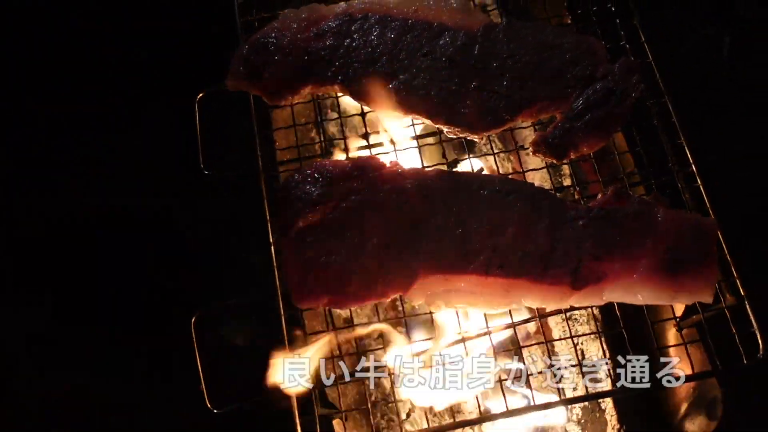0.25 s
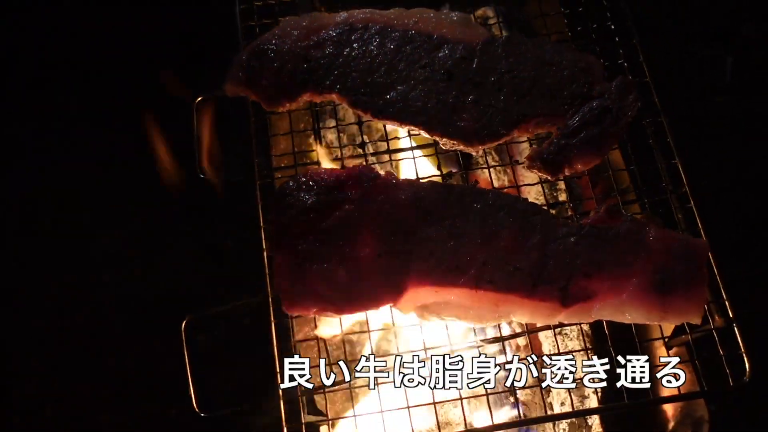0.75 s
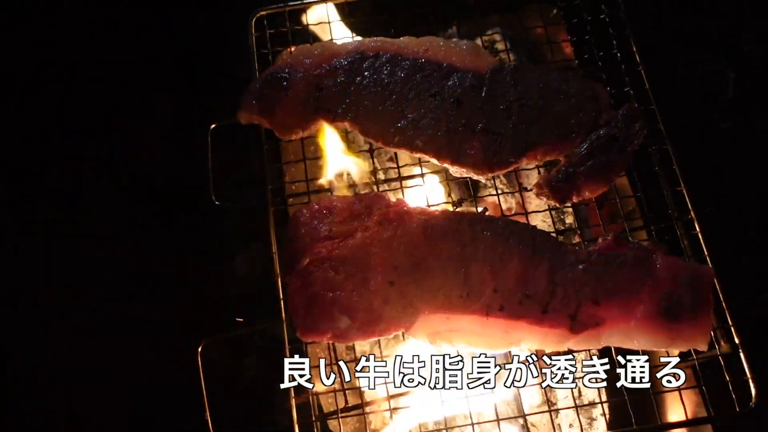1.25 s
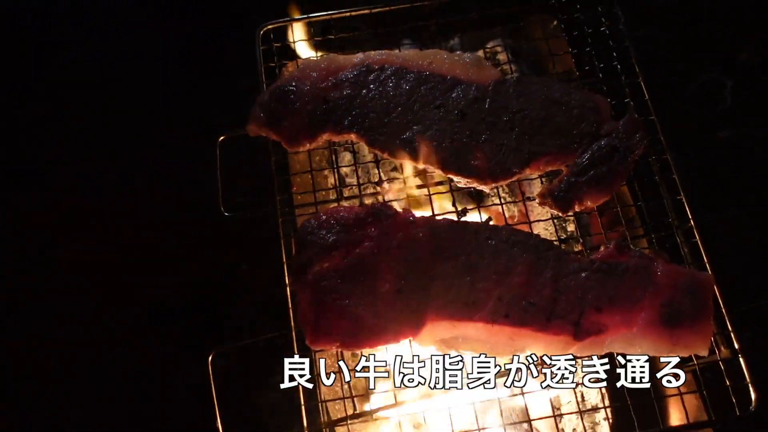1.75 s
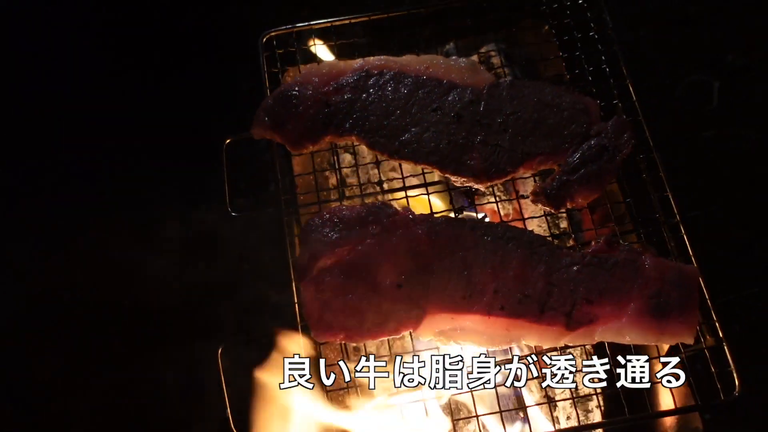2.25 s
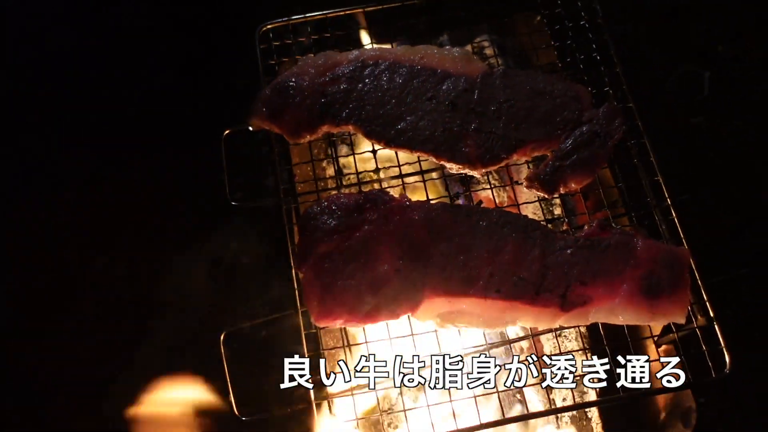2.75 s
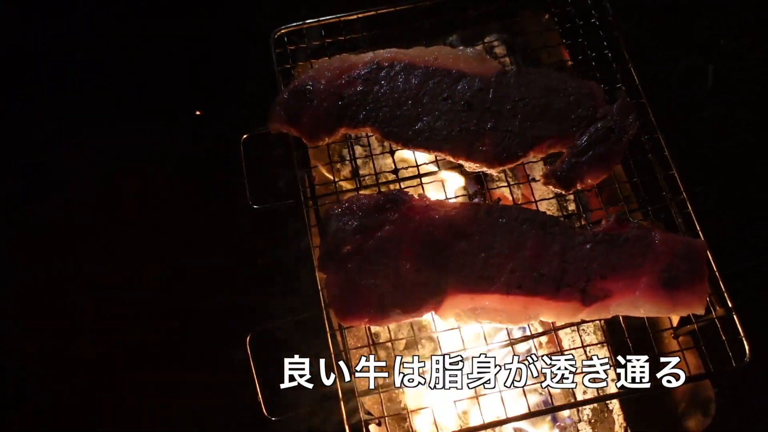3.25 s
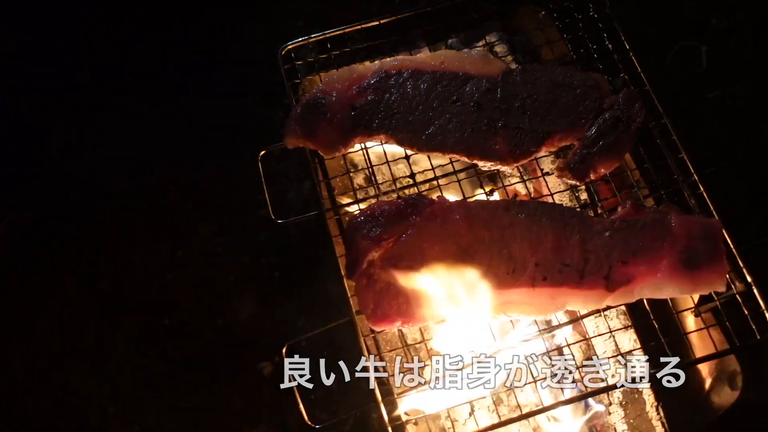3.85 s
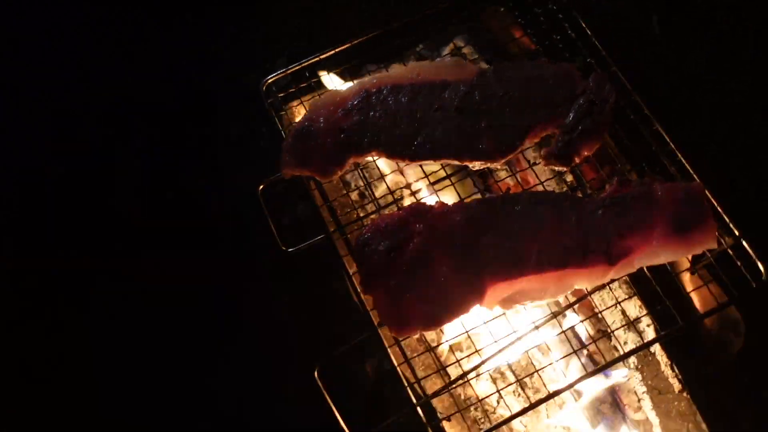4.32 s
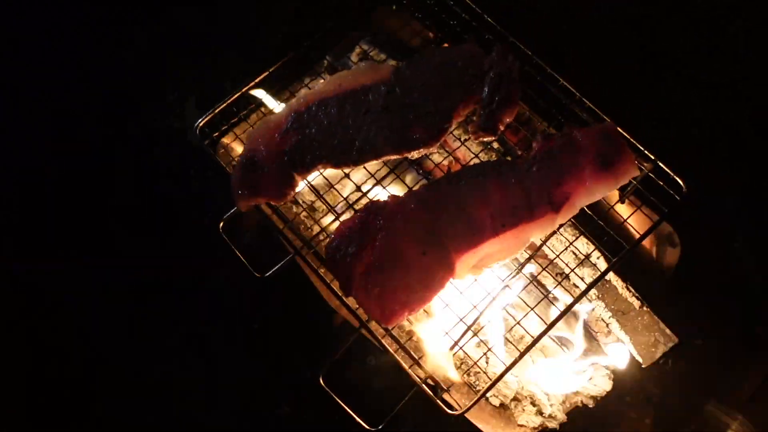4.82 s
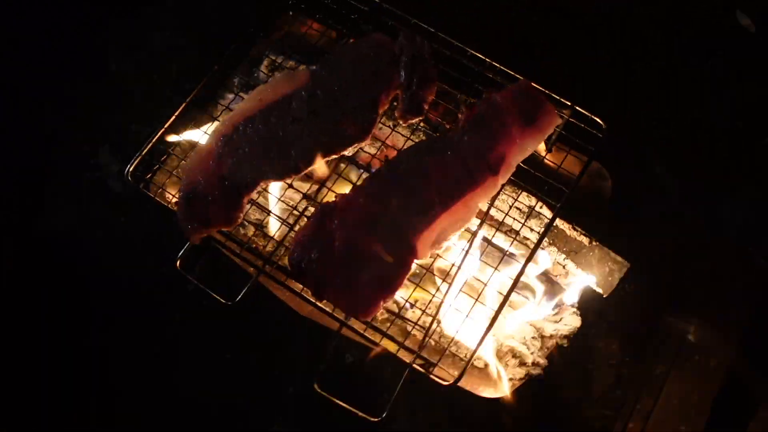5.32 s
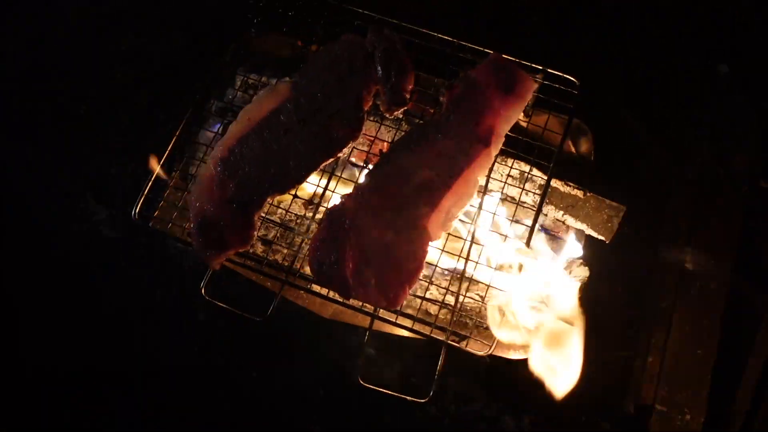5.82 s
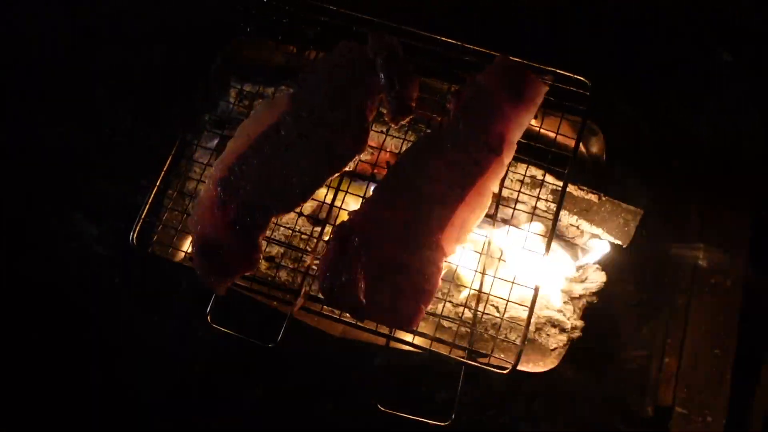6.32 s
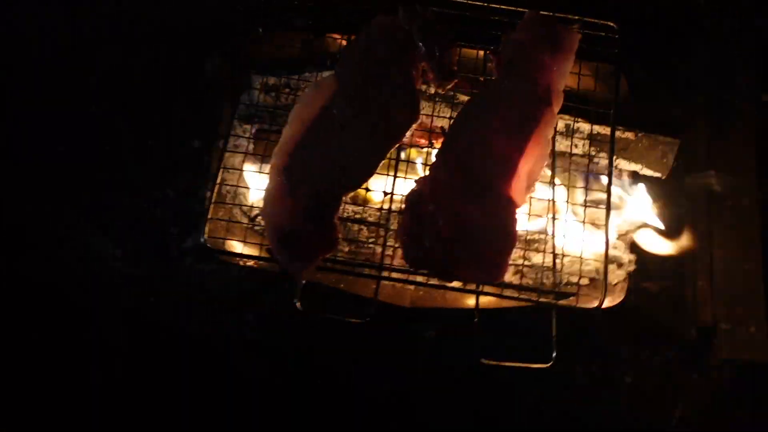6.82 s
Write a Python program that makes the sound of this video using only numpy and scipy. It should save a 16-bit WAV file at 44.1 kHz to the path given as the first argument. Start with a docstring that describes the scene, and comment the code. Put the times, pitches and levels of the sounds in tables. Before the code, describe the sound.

A close microphone picks up meat grilling over hot coals in the open air. After a quick, duller rush of noise, juices hiss steadily with a dense, fine crackle. Sharp little pops of fat come throughout, a few louder than the rest, along with quick surges of harder frying. The sound is bright and nearly dry, with little bass and almost nothing in the background.

```python
"""Steaks sizzle close by on a wire grill over charcoal, outdoors, opening on a fuller rush that dies away.
Juice boils off in a hiss full of tiny steam bursts and swells in spurts of fast frying. Fat pockets
pop and sputter. The bursts scatter briefly among the coals, and the fire tray under the mesh sends
the sizzle back once, a moment late. A faint rumble lies far behind."""
import sys
import numpy as np
from scipy import signal
from scipy.fft import rfft, irfft, next_fast_len
from scipy.io import wavfile
from scipy.ndimage import uniform_filter1d, map_coordinates

SR = 44100
rng = np.random.default_rng(int(sys.argv[2]) if len(sys.argv) > 2 else 0)


def wav_record(signal):
    """Record a signal, one row per channel, as 16-bit PCM in the file named by sys.argv[1]."""
    frames = np.transpose(np.atleast_2d(signal))
    bounded = np.clip(frames, -1, 1)
    # unit amplitude maps onto the largest positive 16-bit level
    quanta = np.round(bounded * 32767).astype(np.int16)
    wavfile.write(sys.argv[1], SR, quanta)


N = 312170


def amp(db):
    return 10 ** (np.asarray(db) / 20)


def unit(x):
    return x / np.sqrt(np.mean(x ** 2) + 1e-20)


def along(points, hz):
    """Read (frequency, value) points on a log axis."""
    f, v = np.transpose(points)
    return np.interp(np.log(hz + 1), np.log(f + 1), v)


def curves(rows):
    """One envelope for each column after the time."""
    s, *cols = np.transpose(rows)
    return [np.interp(np.arange(N) / SR, s, c) for c in cols]


def wobble(rate):
    """A smooth random curve, rate knots a second."""
    return map_coordinates(rng.standard_normal(int(N * rate / SR) + 4), [np.arange(N) * rate / SR])


def filtered(x, response):
    """Shape x with a complex frequency response."""
    m = next_fast_len(N + SR // 2)
    return irfft(rfft(x, m) * response(np.fft.rfftfreq(m, 1 / SR)), m)[..., :N]


def resonance(hz, centre_hz, width_hz):
    """A causal band-pass response."""
    return 1j * hz * width_hz / (centre_hz ** 2 - hz * hz + 1j * hz * width_hz)


def panned(pan_db):
    """Left and right gains for a level difference."""
    return amp(np.array([pan_db / 2, -pan_db / 2]))


def bubble_hiss(colour, patchy_db, flutter_db):
    """Countless small bubbles: noise in patches, with a fast flutter shared by all bands."""
    # stereo width of the hiss: (frequency [Hz], side minus mid [dB])
    width = [(60, -18), (110, -16), (200, -8), (380, -4), (700, -10.5), (1290, -2), (2380, -13),
             (4400, -40), (8120, -87.5), (15000, -44)]
    spectra = signal.stft(rng.standard_normal((2, N)), nperseg=256)[2]
    patches = uniform_filter1d(uniform_filter1d(rng.standard_normal(spectra.shape[1:]), 8, 0), 6, 1)
    pair = signal.istft(spectra * amp(patchy_db * unit(patches)), nperseg=256)[1][:, :N]
    pair *= amp(flutter_db * wobble(140))
    mid, side = filtered(pair, lambda hz: amp(along(colour, hz)) * [hz >= 0, amp(along(width, hz))])
    return unit(np.array([mid + side, mid - side]))


def sizzle(boil, spurt):
    """Juice boils off in an even hiss, with a rougher one riding the spurts."""
    # colour of boiling juice: (frequency [Hz], spectral level [dB])
    boil_colour = [(30, -45), (100, -42), (330, -14.5), (480, -8.5), (650, -4), (1000, -10), (1500, -1.5),
                   (2500, -1.5), (4300, 1.5), (8000, 1), (12500, -5), (15500, -14.5), (17000, 2.5)]
    # colour of fast frying: (frequency [Hz], spectral level [dB])
    fry_colour = [(100, -41), (330, -28), (600, -2.5), (1200, -3.5), (2500, -2), (4300, 0.5), (8000, -2.5),
                  (12500, -7.5), (17000, -28)]
    even = boil * bubble_hiss(boil_colour, patchy_db=1.5, flutter_db=1.23)
    return even + 0.63 * spurt * bubble_hiss(fry_colour, patchy_db=3.0, flutter_db=4.5)


def spurt_envelope():
    """Fast frying comes in bell-shaped swells, summed in power."""
    # swells of frying: (centre time [s], level [dB], length [s])
    spurts = [(0.022, -41, 0.31), (0.602, -42, 0.032), (0.857, -35.5, 0.031), (0.947, -39, 0.11),
              (1.268, -38.5, 0.071), (1.426, -44, 0.074), (1.537, -40.5, 0.049), (1.617, -37, 0.073),
              (1.758, -38, 0.027), (2.035, -42.5, .03), (2.357, -38.5, 0.025), (2.5, -43, .03),
              (2.662, -44.5, .035), (2.812, -38.5, .07), (2.929, -41, .035), (3.609, -40.5, 0.044),
              (3.688, -43.5, 0.059), (3.803, -41, 0.046), (3.936, -39, .012), (4.015, -38.5, .04),
              (4.483, -39, 0.045), (4.878, -37.5, 0.08), (5.3, -44, 0.083), (5.61, -43, .015),
              (5.697, -43, .03), (5.906, -42, .02), (6.193, -43, 0.04), (6.388, -42.5, 0.09),
              (6.549, -43, 0.096), (6.898, -43, 0.04)]
    centre, db, length = np.transpose(spurts)[:, :, None]
    t = np.arange(0, N / SR + .01, .002)
    power = (amp(2 * db) * np.exp(-2.8 * ((t - centre) / length) ** 2)).sum(0)
    return np.interp(np.arange(N) / SR, t, np.sqrt(power))


def steam_bursts(s, crack_db, sputter_db, pitch_hz, thump_db, t60, pan_db, size, q, spiky):
    """Each burst is a crack and a spiky jet of steam, through a broad cavity resonance and a low thump."""
    t, hz = np.arange(size) / SR, np.fft.rfftfreq(size, 1 / SR)
    noise, scatter = rng.standard_normal((len(s), 2, size)).swapaxes(0, 1)
    pitch = pitch_hz[:, None]
    cavity = resonance(hz, pitch, pitch / q) / (1 + 1j * hz / (2.2 * pitch)) ** 2
    cavity *= resonance(hz, 2900, 29500)
    thump = resonance(hz, 700 * np.exp(.1 * scatter[:, 1:2]), 640) ** 2 * resonance(hz, 692, 860) ** 2
    cavity += amp(thump_db)[:, None] * thump
    for k in (2, 3):  # every pocket rings briefly at two pitches of its own
        ring_hz = pitch * np.exp(0.37 * scatter[:, k:k + 1])
        cavity *= 1 + 0.69 * resonance(hz, ring_hz, ring_hz / 7)
    cavity *= (1j * hz / (330 + 1j * hz)) ** 2  # so small a source sends out no bass
    fade = amp(-60 * (t / np.clip(t60, .001, .08)[:, None]) ** 0.93) * np.clip(2 - 2 * t / t[-1], 0, 1)
    jet = rfft(noise * np.exp(spiky * scatter) * fade) * cavity
    jet *= 1 + 0.84 * resonance(hz, pitch, pitch / 6)  # the escaping steam whistles in its pocket
    jet *= (amp(sputter_db) * np.sqrt(SR / 200 / (irfft(jet) ** 2).sum(1)))[:, None]  # rms as if in 5 ms
    crack = -cavity * (amp(crack_db) / np.abs(irfft(cavity)).max(1))[:, None]
    lag_s = 2.5e-6 * scatter[:, :1]  # each burst reaches one side a little earlier
    at = (np.round(s * SR).astype(int)[:, None] + np.arange(size)).ravel()
    channels = []
    for way, gain in zip((1, -1), panned(pan_db)):
        delay = np.exp(-2j * np.pi * hz * (2 / SR + way * lag_s))
        grains = irfft((jet + crack) * delay) * gain[:, None]
        channels.append(np.bincount(at, grains.ravel(), N + size)[:N])
    return np.array(channels)


def fat_pops(pan_db):
    """Fat pockets burst one by one, and each spits a second time, weaker, higher and longer."""
    # the clearest pops: (time [s], crack level [dB], sputter level [dB], pitch [Hz], relative thump [dB])
    pockets = [(.013, -17, -28, 2870, -9), (0.0769, -24, -38.5, 3900, -17), (.2761, -26, -49, 2920, 0),
               (.2937, -23, -52, 8310, -23), (.311, -24, -50, 4730, -36), (0.4016, -15, -33, 4730, 5.5),
               (0.6322, -25, -38, 3920, -25), (.7147, -23, -40, 3020, 1), (0.741, -21, -33.5, 5300, -10),
               (.7435, -25, -31, 5070, 1), (.818, -20, -28, 6250, -2), (0.8491, -9.5, -22.5, 4280, 1.5),
               (0.9033, -24, -42, 3310, 6), (0.9222, -21, -44, 4030, -17), (.9315, -14, -45, 3480, -4),
               (.953, -13, -41, 3720, -3), (0.9685, -18, -37, 5500, 3), (.997, -17, -44, 4200, 5),
               (1.0236, -8, -55, 5640, -16), (1.1514, -21, -42, 3850, 8), (1.2138, -24, -44, 3240, -20),
               (1.2309, -13.5, -28, 3730, 0), (1.2443, -13.5, -31.5, 2660, -24),
               (1.3024, -26, -35, 4170, 7), (1.3819, -29, -37, 4720, 1), (1.422, -14.5, -28.5, 4630, -4),
               (1.512, -19, -33, 3300, -1), (1.5859, -19, -44, 2960, 1), (1.5953, -19, -51, 4910, 3),
               (1.6192, -17, -34.5, 2920, 9), (1.68, -14, -28, 8300, -41), (1.6564, -22, -42, 5900, -11),
               (1.6903, -8, -35, 6400, -3), (1.7439, -7, -30.5, 3540, -4), (1.7641, -24, -50, 3390, -1),
               (1.8005, -22, -51, 3180, -16), (1.807, -21.5, -37, 4070, -8), (1.8383, -25, -45, 3800, 3),
               (1.8523, -14.5, -44, 8400, -20), (1.9144, -23, -44, 5710, 8.5), (2.012, -24, -43, 3000, -7),
               (2.039, -21, -40, 2940, -1), (2.0988, -19.5, -44, 5000, -1), (2.207, -21.5, -53, 4470, -6),
               (2.3677, -19.5, -39, 3950, -11), (2.4351, -17.5, -38, 2900, -3),
               (2.4598, -18, -40, 6230, -28), (2.4793, -23, -42, 5890, -24), (2.4874, -24, -42, 3700, 1),
               (2.5424, -22, -52, 3740, 4.5), (2.633, -31, -37, 5750, -1), (2.7088, -27, -38.5, 4250, 3),
               (2.7688, -24, -32, 5340, -14), (2.783, -20, -28.5, 4230, -21), (2.8006, -21, -37, 4200, -9),
               (2.8234, -20.5, -42, 3680, -4), (2.8595, -23, -43, 4420, -14),
               (2.9195, -17.5, -40, 3600, -15), (3.0381, -19.5, -39, 3920, -13),
               (3.0929, -19, -36.5, 4240, -2), (3.2259, -35, -36.5, 5700, -19),
               (3.4394, -17, -43, 7800, -40), (3.5355, -23, -47, 5540, -33),
               (3.5772, -9, -20.5, 5000, -5.5), (3.6, -25, -44, 3470, -15), (3.683, -21, -40, 5000, -20),
               (3.6868, -15, -35, 4800, -9), (3.707, -18.5, -49, 6100, -34), (3.8266, -18, -52, 3620, -4),
               (3.854, -25, -38, 3930, -18), (3.989, -22, -38, 4730, -14), (4.0056, -26, -36.5, 4000, -30),
               (4.0838, -28, -37.5, 5510, 0), (4.1552, -25.5, -43.5, 3530, 9.5),
               (4.305, -22.5, -50, 4650, -12), (4.3863, -18.5, -40, 4000, -13),
               (4.4514, -20, -24, 4850, -10), (4.4853, -19, -40, 4530, -9), (4.598, -21, -38, 4850, -7),
               (4.6843, -19.5, -48, 4350, -20), (4.7036, -18.5, -40, 4290, -13),
               (4.741, -18.5, -53, 3900, -8), (4.7725, -22, -37, 5600, -32), (4.8, -29, -39, 4480, -13),
               (4.8589, -13, -43, 3720, -5), (4.8963, -12, -45, 3550, -4), (4.948, -32, -37, 5500, 4),
               (4.9601, -24, -40.5, 5240, -2), (5.11, -32, -41, 4000, -16), (5.216, -21.5, -44, 7050, -2),
               (5.286, -19, -48, 3500, -4), (5.3216, -18.5, -44, 5270, -40), (5.362, -21.5, -45, 4490, 2),
               (5.3935, -26, -45, 4140, -10), (5.4066, -22.5, -47, 5040, 4), (5.515, -30, -36.5, 4800, -9),
               (5.761, -15, -35, 3170, -18), (5.7987, -21, -43, 5200, -35), (5.8661, -19, -51, 4260, 0),
               (5.9073, -23, -36.5, 3980, -37), (6.0721, -21.5, -60, 3170, -23),
               (6.134, -24.5, -47, 4830, -26), (6.1397, -20.5, -42, 7000, -19),
               (6.2497, -20.5, -50, 6200, -33), (6.2582, -24, -40, 6180, -22),
               (6.2763, -33, -34, 6000, -34), (6.3792, -24, -44, 4550, -4), (6.4084, -18.5, -51, 3400, -35),
               (6.4423, -19, -54, 2400, -6), (6.5027, -19.5, -38, 5600, -25),
               (6.5381, -16, -32, 3300, -0.5), (6.7065, -23, -53, 4300, -24), (6.8882, -26, -46, 4610, -22),
               (6.9195, -25, -41.5, 3750, 5), (6.9969, -24.5, -35, 5430, -26)]
    s, crack_db, sputter_db, pitch_hz, thump_db = np.transpose(pockets)
    scatter = rng.standard_normal((len(s), 4)).T
    t60 = 0.017 * np.exp(.2 * scatter[0])
    place_db = pan_db[(s * SR).astype(int)] + 0.56 * scatter[1]
    first = steam_bursts(s, crack_db, sputter_db, pitch_hz, thump_db, t60, place_db,
                         size=1024, q=0.56, spiky=0.86)
    gap_s = .003 * np.exp(0.23 * scatter[2])
    second = steam_bursts(s + gap_s, crack_db - 11, sputter_db - 8, 1.5 * pitch_hz, thump_db - 6,
                          1.6 * t60, place_db + 3 * scatter[3], size=1024, q=0.4, spiky=1.0)
    return first + second


def small_pops(frying, pan_db, count=70):
    """Lesser pockets burst at random, more often where the frying is harder."""
    energy, scatter = np.cumsum(frying ** 2), rng.standard_normal((count, 6)).T
    at = np.searchsorted(energy, energy[-1] * rng.random(count))
    return steam_bursts(at / SR, crack_db=-30 + 3 * scatter[0], sputter_db=-51.5 + 4 * scatter[1],
                        pitch_hz=5040 * np.exp(0.24 * scatter[2]), thump_db=-13 + 9 * scatter[3],
                        t60=0.039 * np.exp(.5 * scatter[4]), pan_db=pan_db[at] + 1.7 * scatter[5],
                        size=512, q=0.97, spiky=0.96)


def droplet_crackle(count=2300):
    """Small droplets burst at random moments; a few are much bigger than the rest."""
    when, rank = rng.random((count, 2)).T
    scatter = rng.standard_normal((count, 5)).T
    db = -2.8 * np.log(rank * 1.33 + 0.03)
    return steam_bursts(when * N / SR, crack_db=db + 3.5 + 1.4 * scatter[4], sputter_db=db - 17,
                        pitch_hz=5000 * np.exp(0.49 * scatter[0]), thump_db=-11 + 5 * scatter[1],
                        t60=0.017 * np.exp(0.53 * scatter[2]), pan_db=0.31 * scatter[3] - 1,
                        size=192, q=1.16, spiky=0.4)


def coal_scatter(spits):
    """Coals and ground smear the bursts into a short diffuse tail; each band dies at its own speed."""
    # decay among the coals: (frequency [Hz], t60 [s])
    decay_times = [(300, 0.17), (2000, 0.14), (10000, 0.075)]
    hz, t, spectra = signal.stft(spits.mean(0), SR, nperseg=64)
    fall = amp(-120 * t[:150] / along(decay_times, hz)[:, None])
    power = signal.fftconvolve(np.abs(spectra) ** 2, fall / fall.sum(1, keepdims=True), axes=1)[:, :len(t)]
    noise = signal.stft(rng.standard_normal((2, N)), nperseg=64)[2]
    tail = signal.istft(noise / np.std(noise) * np.sqrt(np.abs(power)), nperseg=64)[1][:, :N]
    mid, side = filtered(tail, lambda f: resonance(f, 2170, 14000) ** 2)  # the ground returns no bass
    return np.array([mid + 0.064 * side, mid - 0.11 * side])


def tray_echo(meat, lag_s=0.001394):
    """The fire tray adds one close reflection that combs the low mids."""
    # strength of the reflection: (frequency [Hz], gain [dB])
    reflection = [(300, -3), (1000, -10.5), (2000, -12), (4000, -42), (9000, -24)]
    return filtered(meat, lambda hz: 1 + amp(along(reflection, hz)) * np.exp(-2j * np.pi * hz * lag_s))


def opening_rush(level_db=-37, hold_s=0.032, fall_db_per_s=123):
    """A fuller, duller noise that fades in the first moments."""
    # colour of the rush: (frequency [Hz], spectral level [dB])
    colour = [(35, -86), (60, -45), (226, -12), (351, -12.5), (521, -2.5), (792, -24), (1320, -8.5),
              (2410, -12), (4030, -5.5), (6560, -23), (10500, -20), (13800, -13.5), (15500, -28)]
    noise = rng.standard_normal((3, N))
    pair = unit(filtered(noise[0] + 0.2 * noise[1:], lambda hz: amp(along(colour, hz))))
    return amp(level_db - fall_db_per_s * np.clip(np.arange(N) / SR - hold_s, 0, None)) * pair


def far_rumble():
    """A faint steady bed, nearly the same on both sides."""
    # colour of the far background: (frequency [Hz], spectral level [dB])
    colour = [(30, 1), (55, 2), (80, 0.5), (250, -4), (500, -29)]
    noise = rng.standard_normal((3, N))
    return amp(-83) * unit(filtered(noise[0] + .12 * noise[1:], lambda hz: amp(along(colour, hz))))


def scene():
    """Harder boiling lifts hiss and crackle together, with the pops on top."""
    # how hard the juice boils, and where: (time [s], level [dB], left minus right [dB])
    boiling = [(0.0, -43, 0.5), (0.24, -46, -1.5), (0.67, -43.5, -0.5), (1.28, -42.5, -1), (1.55, -46, -1),
               (1.75, -40.5, -1), (2.64, -42, -0.5), (3.3, -42.5, -1.5), (3.84, -44.5, -1.5),
               (4.4, -42.5, -1), (4.8, -40.5, -0.5), (5.1, -43.5, -0.5), (5.8, -43, -0.5),
               (6.11, -45, -0.5), (6.41, -44, -1), (6.65, -45.5, -0.5), (7.08, -46, -2)]
    boil_db, pan_db = curves(boiling)
    boil, spurt = amp(boil_db), spurt_envelope()
    frying = np.hypot(boil, 1.02 * spurt)
    spits = frying * droplet_crackle() + fat_pops(pan_db) + small_pops(frying, pan_db)
    meat = panned(pan_db) * sizzle(boil, spurt) + spits + amp(-10) * coal_scatter(spits)
    return tray_echo(meat) + opening_rush() + far_rumble()


def record(dry):
    """Two small microphones lose the bass, ring a little near 4 kHz and cut the highest treble."""
    # imbalance of the two microphones: (frequency [Hz], left minus right [dB])
    tilt = [(100, 1), (500, 0), (4000, -0.46), (8000, 0.2), (13000, 1.5)]
    bass_hz, top_hz = 250, 15800
    ports = lambda hz: panned(along(tilt, hz)) * (1 + 0.23 * resonance(hz, 4320, 350))
    return filtered(dry, lambda hz: ports(hz) * (1j * hz / (bass_hz + 1j * hz)) * (hz < top_hz))


dry = scene()
out = record(dry)
wav_record(out)
```